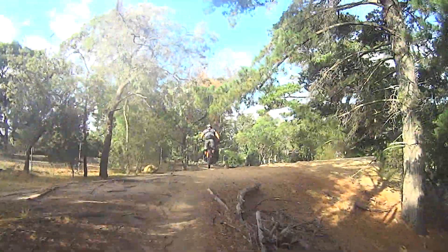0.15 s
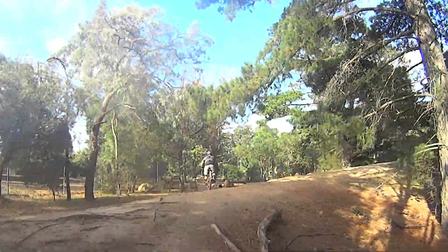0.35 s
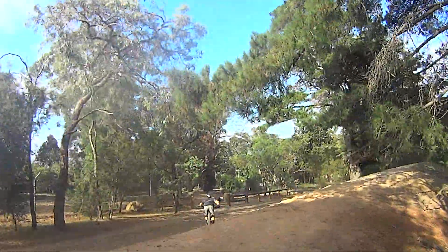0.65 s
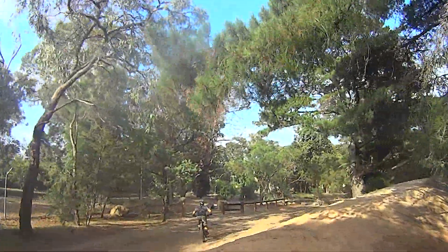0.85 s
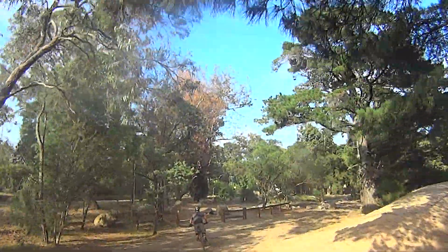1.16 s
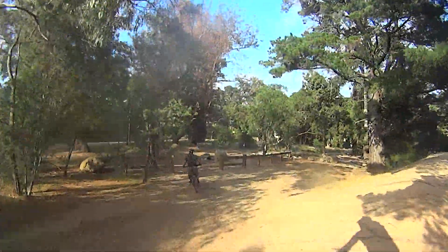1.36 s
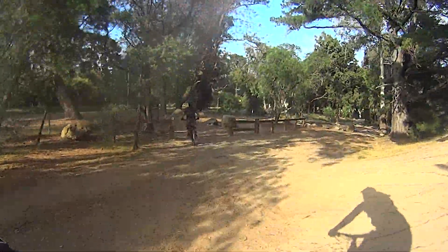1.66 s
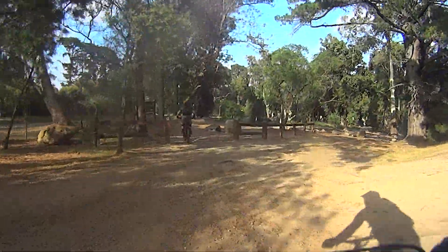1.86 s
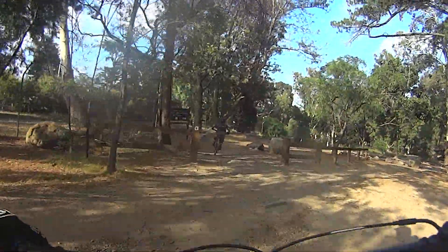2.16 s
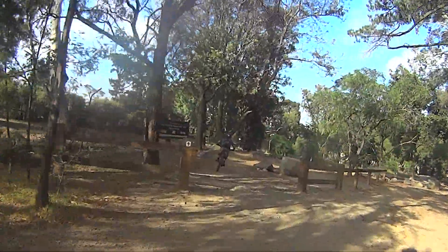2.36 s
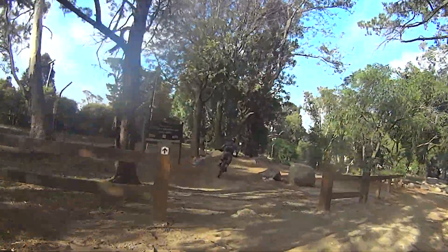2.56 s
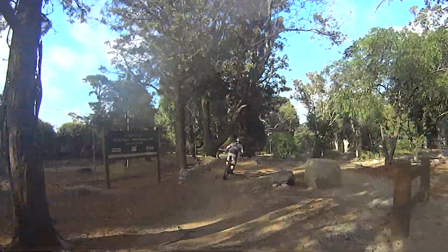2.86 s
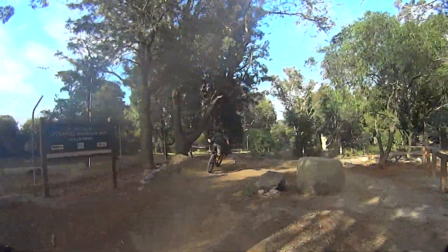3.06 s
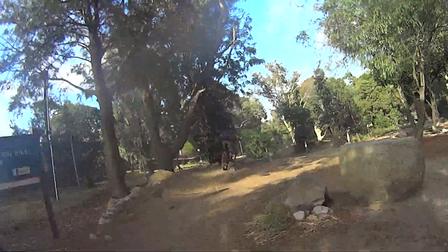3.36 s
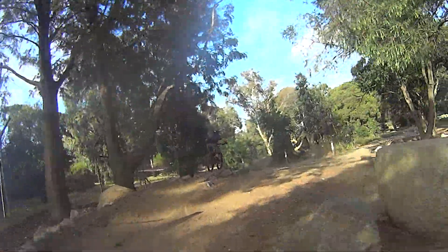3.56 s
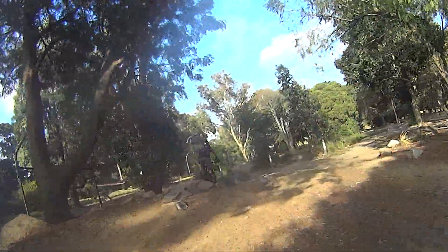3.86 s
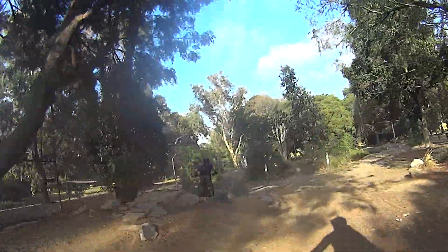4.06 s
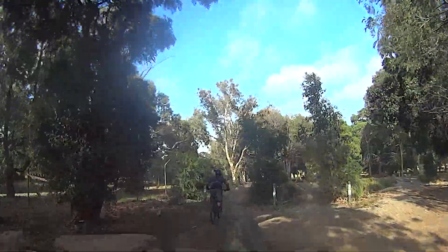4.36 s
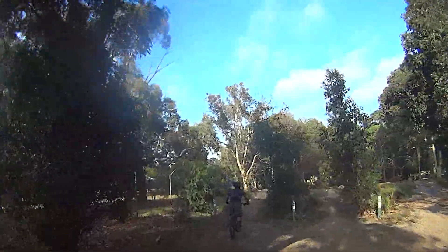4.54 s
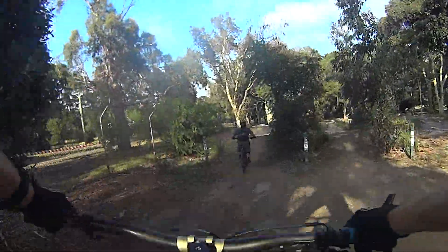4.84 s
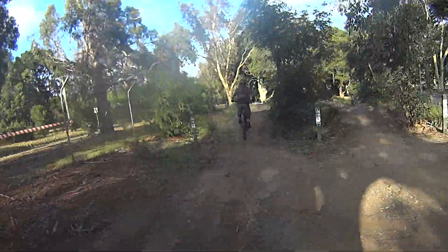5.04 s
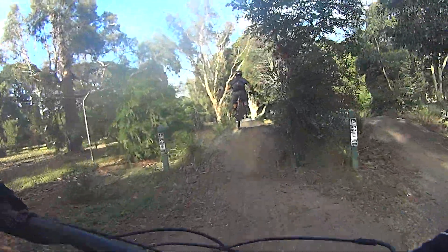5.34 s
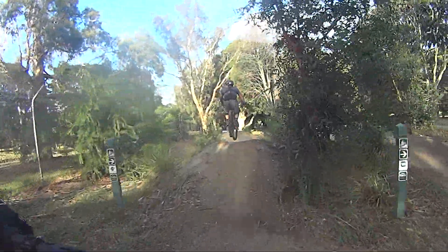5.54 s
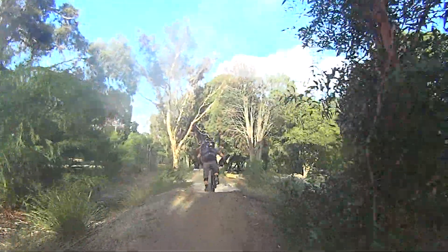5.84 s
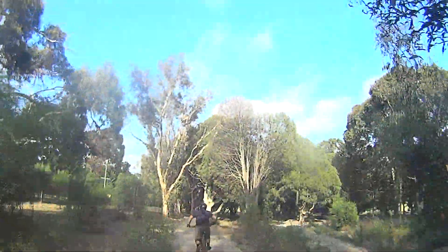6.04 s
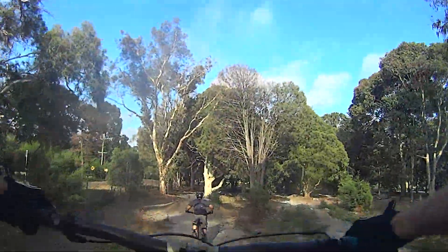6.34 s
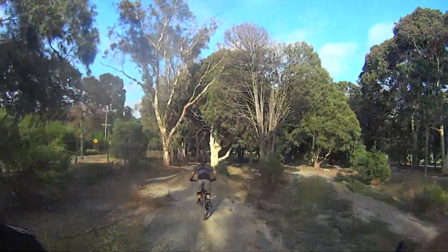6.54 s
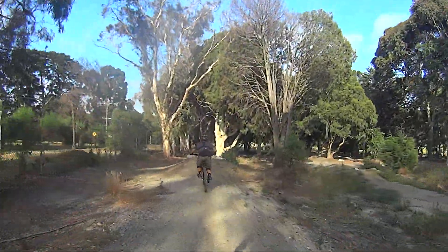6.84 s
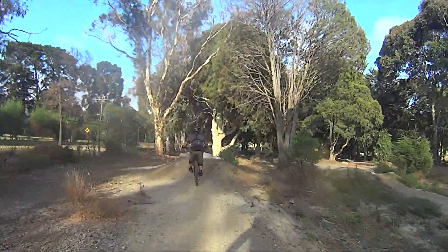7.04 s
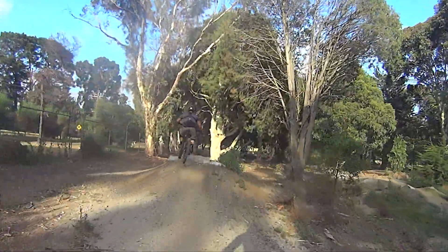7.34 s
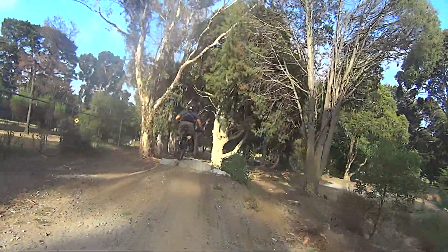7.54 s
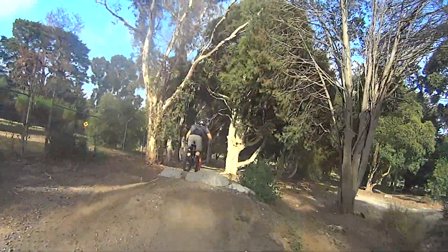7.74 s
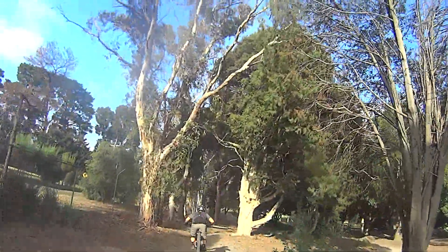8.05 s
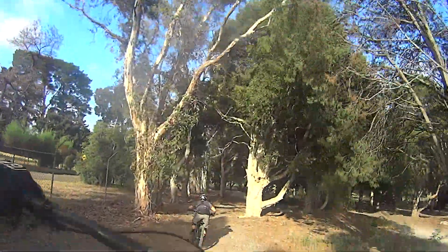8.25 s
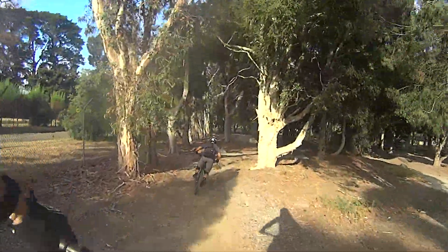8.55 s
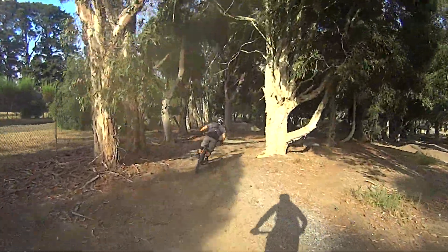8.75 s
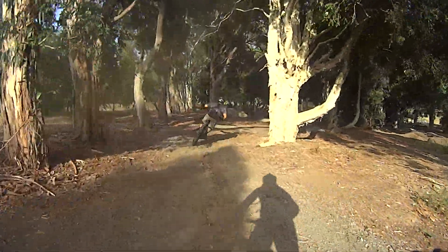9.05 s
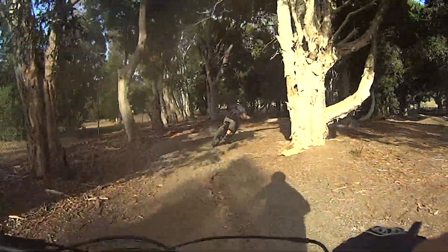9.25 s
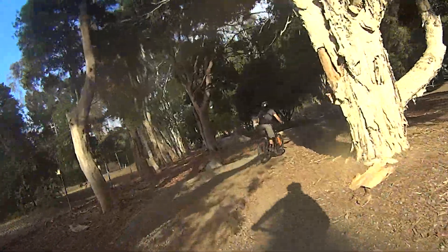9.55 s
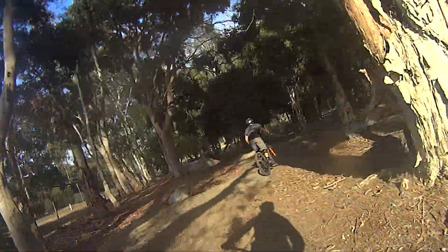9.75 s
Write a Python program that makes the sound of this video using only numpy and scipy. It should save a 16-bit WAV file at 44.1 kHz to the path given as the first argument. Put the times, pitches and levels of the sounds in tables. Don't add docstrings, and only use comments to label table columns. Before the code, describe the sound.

Boxy, nasal tyre grit and ticking freewheel on a dry trail, dropping out over jumps, then crunchy landings, dull thumps and stone cracks.

```python
import sys
import numpy as np
from scipy import signal
from scipy.fft import rfft, irfft, next_fast_len
from scipy.io import wavfile

SR = 44100
rng = np.random.default_rng(int(sys.argv[2]) if len(sys.argv) > 2 else 0)


def digitize_waveform(pressure):
    field = np.atleast_2d(pressure).T
    bounded = np.clip(field, -1, 1)
    quanta = np.round(bounded * 32767).astype(np.int16)
    wavfile.write(sys.argv[1], SR, quanta)


def attenuation_scalar(level_db):
    decades = np.asarray(level_db, float) / 20
    return 10 ** decades


N = 436590
T = np.arange(N) / SR
SIZE = next_fast_len(N + SR // 4)
HZ = np.maximum(np.arange(SIZE // 2 + 1) * SR / SIZE, 1)
PORT_GAP_S = 2.3e-5
PORT_TURN = 2 * np.pi * HZ * PORT_GAP_S
RISE_S = 0.002

# (frequency [Hz], width [Hz], level [dB])
HOUSING = [(1632, 185, 0), (3190, 220, -18), (5160, 260, -22)]
# (frequency [Hz], left minus right [dB])
LEAN = [(60, 0), (140, -0.5), (340, -1), (820, 2.5), (1970, 3.5), (4710, 1), (11300, -1.5)]
# (frequency [Hz], lead of the left [rad])
LEAD = [(60, 0), (130, -.6), (340, -1.8), (860, -2.4), (1300, -1.6)]
# (time of the top [s], peak level [dB], brightness [dB])
SLAPS = [(0.6673, -21, 11), (1.4402, -19, 6), (1.737, -14, -25), (1.7726, -13.5, 7), (2.368, -10, -15),
         (2.503, -9, 0.5), (3.3053, -5, -5), (3.4215, -13, 11), (3.4427, -6, 2), (3.7605, -12, -2),
         (3.8182, -16, -16), (4.14, -17.5, 2), (4.601, -15, 11), (4.66, -12.5, -2.5), (4.8082, -19.5, 3),
         (4.8323, -15.5, 6.5), (4.8983, -12.5, -1), (4.9351, -12.5, 4.5), (5.044, -17.5, 5),
         (5.101, -13, 4), (5.1254, -18, -7), (5.1357, -27, -1), (5.1762, -12.5, -2), (5.9176, -16.5, -1),
         (6.1826, -24, 12), (7.343, -14.5, 0), (8.737, -21, -13), (8.7502, -11, -13), (9.069, -18, -4),
         (9.1324, -17, 3)]


def rms_one(x):
    return x / np.sqrt(np.mean(x ** 2) + 1e-20)


def at_hz(points):
    hz, value = np.transpose(points)
    return np.interp(np.log(HZ), np.log(hz), value)


def causal(magnitude):
    cepstrum = irfft(np.log(rms_one(magnitude)), SIZE)
    cepstrum[1:SIZE // 2] *= 2
    cepstrum[SIZE // 2 + 1:] = 0
    return np.exp(rfft(cepstrum))


def colour(points):
    return causal(attenuation_scalar(at_hz(points)))


def resonance(hz, width_hz):
    return 1 / (1 + 1j * (HZ ** 2 - hz ** 2) / (HZ * width_hz))


def double_resonance(hz, width_hz):
    response = resonance(hz, width_hz) ** 2
    return response / np.sqrt(np.mean(np.abs(response) ** 2))


def drift(rate):
    r = np.exp(-80 * np.pi * rate / SR)
    slow = signal.lfilter([1], [1, -2 * r, r * r], rng.standard_normal(N // 40 + 2002))[2000:]
    return np.interp(np.arange(N) / 40, np.arange(len(slow)), rms_one(slow))


def gritty(per_s, spread_db, grain_s, bed):
    size_db = spread_db * np.minimum(rng.exponential(1, N), 3.3)
    grains = attenuation_scalar(size_db) * (rng.random(N) < per_s / SR)
    r = np.exp(-1 / (grain_s * SR))
    return rms_one(bed + signal.lfilter([1], [1, -r], grains))


def bursts(times, levels_db, fall_s):
    clicks = np.full(N, 1e-18)
    np.add.at(clicks, (np.asarray(times) * SR).astype(int), attenuation_scalar(levels_db))
    return signal.lfilter([1], [1, -np.exp(-1 / (fall_s * SR))], clicks)


def lumps(times, halves_s, levels_db):
    out = np.zeros(N)
    for s, half, db in np.broadcast(times, halves_s, levels_db):
        near = slice(max(int((s - 4 * half) * SR), 0), int((s + 4 * half) * SR))
        out[near] += attenuation_scalar(db) * np.exp(-.5 * ((T[near] - s) / half) ** 2)
    return out


def stereo_tilt(turn=0):
    left = attenuation_scalar(at_hz(LEAN) / 2) * np.exp(.5j * turn)
    return np.array([left, 1 / left])


def to_capsules(envelope, response, turn=0, blows=0):
    # (frequency [Hz], left-right likeness [0 to 1])
    likeness = [(30, .9), (300, .68), (900, .7), (1600, .95), (2500, .42), (3200, .48), (4000, .3),
                (5100, .8), (7000, .4), (11000, .3)]
    noise = envelope * rng.standard_normal((3, N))
    noise[0] += blows
    shared, left, right = rfft(noise, SIZE)
    alike = np.clip(at_hz(likeness), 0, 1)
    pair = np.sqrt(alike) * shared + np.sqrt(1 - alike) * np.array([left, right])
    return pair * response * stereo_tilt(turn)


def wind(blows):
    # (time [s], level [dB])
    gusts = [(0.0, -38.5), (0.77, -30.5), (0.82, -52), (1.13, -51), (1.68, -43.5), (1.82, -34),
             (2.23, -42.5), (3.36, -33.5), (4.3, -47), (4.57, -28.5), (5.02, -46), (5.1, -32), (5.6, -44),
             (8.74, -39), (8.96, -31), (9.21, -54), (9.32, -36), (9.9, -48)]
    # (frequency [Hz], density [dB per Hz])
    buffeting = [(10, -13), (18, -6), (27, 9), (45, -3), (75, -4.5), (110, -19), (170, -9.5), (300, -58.5)]
    trim_db = -3.5
    s, peak_db = np.transpose(blows)[:2]
    jolts = bursts(s, peak_db - 22, fall_s=0.022)
    level = attenuation_scalar(trim_db + np.interp(T, *np.transpose(gusts))) + jolts
    return to_capsules(level * attenuation_scalar(2.8 * drift(15.0)), colour(buffeting))


def hum():
    # (time [s], frequency [Hz], level [dB])
    drumming = [
        (1.6, 65.4, -64),
        (1.642, 69.2, -43.5),
        (2.286, 76.2, -44),
        (2.466, 69.9, -45),
        (3.15, 80, -43.5),
    ]
    s, hz, level_db = np.transpose(drumming)
    level = attenuation_scalar(np.interp(T, s, level_db, left=-120, right=-120) + 3)
    return level * np.sin(2 * np.pi * np.cumsum(np.interp(T, s, hz)) / SR)


def hub():
    # (time [s], rate [clicks per s], level [dB])
    pawls = [
        (0, 35, -39),
        (1.6, 59, -43),
        (3, 73, -66),
        (4.598, 69, -53),
        (6.5, 54, -39),
        (8.499, 76, -38),
        (9.9, 82, -60),
    ]
    s, per_s, level_db = np.transpose(pawls)
    turns = np.cumsum(np.interp(T, s, per_s)) / SR
    at = T[1:][np.diff(np.floor(turns)) > 0]
    uneven_db = 2 * np.interp(at, T, drift(30))
    clicks = bursts(at, np.interp(at, s, level_db) + 11.5 + uneven_db, fall_s=0.0012)
    return to_capsules(clicks, resonance(4760, 330) ** 2)


def ticks():
    # (time [s], peak level [dB])
    snaps_at = [(0.591, -35), (0.637, -35), (1.075, -34.5), (1.7726, -32), (1.789, -29), (1.92, -30.5),
                (1.9694, -24), (2.286, -33), (2.504, -35), (2.675, -31), (2.748, -32), (2.797, -35),
                (3.415, -32), (4.316, -40), (4.8356, -32), (4.932, -32), (5.0855, -35), (5.1088, -38),
                (5.1116, -24.5), (5.169, -36), (5.29, -30), (5.9882, -32), (6.8199, -35), (7.214, -36),
                (7.2639, -34), (8.0663, -28.5), (8.65, -36), (8.719, -30.5), (9.3163, -35)]
    # (frequency [Hz], density [dB per Hz])
    tick_colour = [(1500, -39), (3000, -12.5), (5000, 2), (8000, -4.5), (11000, -13.5)]
    # (frequency [Hz], density [dB per Hz])
    hiss_colour = [(2500, -2.5), (4000, -9.5), (5000, -3), (7000, -8.5), (11000, -12)]
    # (start [s], end [s], level [dB])
    gravel = [
        (1.215, 1.27, -46),
        (1.77, 1.876, -44),
        (5.116, 5.248, -38.5),
        (8.423, 8.503, -56),
        (8.733, 8.83, -49),
    ]
    s, peak_db = np.transpose(snaps_at)
    sprays = sum(attenuation_scalar(db) * np.interp(T, [start, start + 0.0048, end], [0, 1.6, 0]) for start, end, db in gravel)
    snaps = bursts(s, peak_db - 2, fall_s=.0022)
    snaps = snaps + sprays * gritty(per_s=140.0, spread_db=8.0, grain_s=0.012, bed=0.27)
    hiss = attenuation_scalar(-52.5 + 0.8 * drift(4.3))
    return to_capsules(snaps, colour(tick_colour), PORT_TURN) + to_capsules(hiss, colour(hiss_colour), PORT_TURN)


def clinks():
    # (time [s], peak level [dB])
    chain = [
        (1.276, -39),
        (1.441, -47),
        (3.425, -29),
        (3.439, -25),
        (4.601, -33),
        (4.61, -29),
        (5.172, -27),
    ]
    s, peak_db = np.transpose(chain)
    shared, left, right = bursts(s, peak_db, fall_s=.003) * rng.standard_normal((3, N))
    band = signal.butter(2, [3700, 5700], "band", fs=SR, output="sos")
    return 3 * signal.sosfilt(band, shared + .6 * np.array([left, right]))


def mount_blows():
    # (time of the top [s], peak level [dB], pitch [Hz], length [cycles])
    camera_knocks = [(0.003, -24.5, 247, 4.6), (0.045, -17.5, 286, 3.4), (0.113, -17, 209, 6.1),
                     (0.181, -17, 222, 3), (0.326, -18.5, 275, 2.7), (0.403, -17, 235, 5.8),
                     (0.767, -18, 280, 3.5), (0.94, -15, 213, 5.2), (1.001, -11, 285, 7.7),
                     (2.053, -17, 229, 4.3), (2.643, -15.5, 296, 3.7), (2.806, -10.5, 294, 5.5),
                     (3.053, -15.5, 260, 2.7), (3.267, -15, 204, 2.3), (3.277, -13, 246, 4),
                     (3.345, -8, 271, 3.2), (3.495, -16, 246, 6.6), (3.511, -10.5, 271, 4.5),
                     (5.1, -10.5, 254, 1.3), (5.194, -12, 266, 2.3), (5.227, -11, 197, 4.3),
                     (5.234, -12, 216, 11), (5.315, -15.5, 263, 5.3), (6.071, -12.5, 276, 4),
                     (6.799, -10, 289, 6.5), (8.162, -28, 594, 2.1), (8.219, -17, 193, 6),
                     (8.889, -15, 206, 3.4), (8.953, -11.5, 230, 2.9), (8.961, -13, 273, 11),
                     (9.448, -27, 230, 3.4), (9.456, -11.5, 250, 4.9), (9.68, -21, 230, 5.3)]
    # (time of the
    # top [s], peak level [dB], pitch [Hz], snap [dB])
    thumps = [
        (1.091, -5.5, 120, -26),
        (1.443, -22.5, 199, 4),
        (3.407, -16, 152, -3.5),
        (3.418, -11.5, 189, -5),
        (3.426, -7, 123, -11.5),
        (3.439, -22.5, 73, -11),
        (5.045, -15.5, 260, 0),
        (5.259, -21, 108, -22),
    ]
    # (time of the top [s], peak level [dB])
    taps = [(0.097, -26), (0.258, -27.5), (0.387, -28), (0.46, -19), (0.883, -20.5), (1.066, -27),
            (1.157, -20.5), (1.298, -22.5), (1.326, -26.5), (1.375, -27.5), (1.786, -19.5), (1.827, -31),
            (3.141, -28), (3.195, -24), (3.581, -24.5), (3.945, -22), (4.593, -20.5), (4.622, -26),
            (4.723, -31), (5.023, -31), (5.061, -22), (5.075, -22), (5.524, -24), (6.203, -22.5),
            (7.197, -21), (7.305, -25.5), (8.296, -26), (8.325, -21), (8.675, -32), (9.313, -19),
            (9.537, -20.5)]
    rows = []
    for s, db, hz, cycles in camera_knocks:
        snap_db = -7.5 + 8.5 * np.log2(hz / 246)
        rows.append((s, db, hz, snap_db, cycles))
    for s, db, hz, snap_db in thumps:
        rows.append((s, db, hz, snap_db, 2.93))
    for (s, db), luck in zip(taps, rng.standard_normal(len(taps))):
        rows.append((s, db, 227 + 32 * luck, -6.5, 5.3))
    return rows


def knocks(blows):
    out, t = np.zeros((2, N + SR)), np.arange(SR // 8) / SR
    for (s, peak_db, hz, snap_db, cycles), luck in zip(blows, rng.random(len(blows))):
        fall = cycles / hz / np.log(1000)
        shape = (t / fall) ** 2 * np.exp(2 - 2 * t / fall)
        shape = shape + 0.34 * (1 - np.exp(-t / fall)) ** 2 * np.exp(-t / 0.0082)
        at = max(round((s - fall) * SR), 0)
        for side, (turn, body_db) in enumerate([(-0.42, -3), (1.0, 0.1)]):
            turn = turn * min(hz / 260, 1)
            body = np.cos(2 * np.pi * hz * (t - fall) + luck + turn)
            out[side, at:at + len(t)] += attenuation_scalar(peak_db + body_db) * shape * body
    return out[:, :N]


def bracket(blows):
    # (frequency [Hz], width [Hz], level [dB])
    modes = [(735, 49, -1.5), (882, 39, -10.5), (1090, 22, -16.5), (1348, 51, -13.5)]
    # (time [s], level [dB])
    chain_hits = [
        (3.42, -8),
        (3.4404, -2.5),
    ]
    chain_favours = [-18, 1, 2.5, 2.5]
    knock_s, peak_db, _, snap_db, _ = np.transpose(blows)
    slap_s, slap_db, bright_db = np.transpose(SLAPS)
    hit_s, hit_db = np.transpose(chain_hits)
    s = np.r_[knock_s, slap_s - RISE_S, hit_s]
    db = np.r_[peak_db + snap_db, slap_db + bright_db - 20, hit_db]
    luck = rng.standard_normal((len(modes), len(knock_s) + len(slap_s)))
    luck = np.c_[luck, np.outer(chain_favours, np.ones(len(hit_s)))]
    rung = 0
    for (hz, width, mode_db), z in zip(modes, luck):
        strikes = bursts(s, db + mode_db + 36.5 + 5.7 * z, fall_s=1e-5)
        rung = rung + rfft(strikes, SIZE) * resonance(hz, width)
    rung = rung / (1 + 1j * HZ / 2500) ** 2
    return rung * stereo_tilt(at_hz(LEAD))


def frame(rumble_db, blows):
    # (frequency [Hz], density [dB per Hz])
    rumble_colour = [(53, -21), (90, -7.5), (226, -3.5), (424, -6), (572, -10), (671, -8), (905, -16),
                     (1230, -17), (1400, -21), (1820, -27), (3080, -120)]
    # (frequency [Hz], density [dB per Hz])
    snap_colour = [(200, 0), (380, -1), (600, -3), (1100, -7), (1450, -25), (3000, -49)]
    # (start [s], end [s], level [dB])
    rattles = [
        (1.045, 1.321, -37),
        (1.794, 1.94, -38),
        (3.435, 3.492, -33),
        (4.665, 4.764, -38),
        (6.128, 6.255, -38.5),
        (7.959, 8.118, -39.5),
    ]
    s, peak_db, _, snap_db, _ = np.transpose(blows)
    shake = gritty(per_s=60, spread_db=2.5, grain_s=.004, bed=1.5)
    edges = bursts(s, peak_db + snap_db + 9.0, fall_s=1e-5)
    rattle = bursts(np.maximum(s - .003, 0), peak_db + snap_db - 1.5, fall_s=0.008)
    loose = sum(attenuation_scalar(db) * ((T > start) & (T < end)) for start, end, db in rattles)
    rattle = rattle + loose * gritty(per_s=120.0, spread_db=1.0, grain_s=0.0019, bed=1.0)
    turn = at_hz(LEAD)
    rumble = to_capsules(attenuation_scalar(rumble_db + 6.5) * shake, colour(rumble_colour), turn)
    return rumble + to_capsules(rattle, colour(snap_colour), turn, blows=edges) + bracket(blows)


def impacts():
    # (time of the top [s], peak level [dB], brightness [dB])
    rebounds = [
        (1.277, -25, 8),
        (3.449, -7, -9),
        (3.454, -20, -23),
        (4.61, -31, 8),
    ]
    # (time of the top [s], peak level [dB])
    stones = [
        (2.238, -8),
        (2.873, -8),
        (5.761, -5.5),
        (7.4458, -11),
        (7.6629, -7),
        (8.715, -16),
        (9.0201, -9.5),
    ]
    # (time of the top [s], peak level [dB])
    scatter = [
        (6.761, -3.5),
        (6.8995, 1),
        (6.947, -7),
        (7.016, -8.5),
    ]
    edge_db = -32
    dull = [(s, db, edge_db - db) for s, db in stones + scatter]
    s, peak_db, bright_db = np.transpose(SLAPS + rebounds + dull)
    return s - RISE_S, peak_db, bright_db


def struck_air(s, peak_db):
    # (time [s], half length [s], level [dB])
    swishes = [
        (8.4, 0.012, -38),
        (8.451, 0.023, -31),
        (8.642, 0.007, -30),
    ]
    blows = bursts(s, peak_db + 9.0, fall_s=1e-5)
    grind = lumps(s + 0.0011, 0.003, peak_db - 15.5)
    swells = grind + lumps(*np.transpose(swishes))
    return to_capsules(swells, double_resonance(*HOUSING[0][:2]), blows=blows)


def pebble_drags():
    # (time of the middle [s], half length [s], peak level [dB])
    early = [(0.052, 0.0023, -20), (0.069, 0.0011, -23), (0.123, 0.0034, -25), (0.188, 0.0021, -25),
             (0.247, 0.0024, -23), (0.3071, 0.0021, -29), (0.7966, 0.0018, -24), (0.814, 0.0021, -25),
             (1.118, 0.0027, -23.5), (1.173, 0.0019, -19.5), (1.239, 0.0024, -19.5), (1.751, 0.0031, -24),
             (1.794, 0.0075, -28), (1.817, 0.0022, -21), (1.84, 0.015, -25.5), (1.867, 0.0039, -17),
             (1.887, 0.0063, -21), (1.9, 0.0012, -19), (1.934, 0.0019, -18.5), (1.965, 0.0044, -20.5),
             (2.102, 0.0022, -19), (2.135, 0.004, -16), (2.164, 0.0023, -19), (2.218, 0.0023, -20),
             (2.275, 0.0025, -20), (2.2893, 0.0023, -20), (2.297, 0.0019, -26), (2.324, 0.0022, -22),
             (2.337, 0.0019, -17), (2.347, 0.0036, -19), (2.362, 0.0022, -17), (2.395, 0.0021, -18),
             (2.408, 0.0063, -24), (2.453, 0.0077, -23), (2.465, 0.0012, -12), (2.493, 0.0045, -23),
             (2.539, 0.0026, -19), (2.576, 0.0053, -20.5), (2.613, 0.0021, -23), (2.638, 0.0052, -20),
             (2.664, 0.0056, -21), (2.685, 0.0033, -26), (2.7473, 0.003, -26), (2.92, 0.0019, -30),
             (2.926, 0.0031, -24), (2.998, 0.003, -24), (3.044, 0.004, -23), (3.17, 0.0025, -30),
             (3.19, 0.0037, -23.5), (3.277, 0.0039, -20), (3.29, 0.0022, -21), (3.371, 0.002, -23),
             (3.388, 0.0021, -20), (3.4, 0.006, -22), (3.4119, 0.0021, -21), (3.618, 0.0025, -21)]
    middle = [(3.65, 0.006, -15), (3.6924, 0.004, -22), (3.7811, 0.0031, -22), (3.809, 0.0028, -20),
              (3.8527, 0.0029, -20.5), (3.8834, 0.0022, -19), (3.9276, 0.0063, -19.5),
              (3.9514, 0.0031, -20.5), (3.9622, 0.0016, -20), (4.0565, 0.0017, -20), (4.0866, 0.0034, -25),
              (4.3195, 0.0027, -18), (4.3678, 0.002, -21), (4.4439, 0.0025, -24), (4.4666, 0.0044, -24),
              (4.4961, 0.0026, -25), (4.5074, 0.0033, -24), (4.6795, 0.0033, -26.7), (5.1369, 0.002, -16),
              (5.1883, 0.0023, -15.5), (5.211, 0.0046, -17), (5.3484, 0.0019, -24), (5.3958, 0.0023, -23),
              (5.425, 0.0025, -28), (5.6056, 0.0033, -22), (5.625, 0.0013, -20), (5.667, 0.0013, -29),
              (5.692, 0.024, -22.5), (5.7155, 0.0035, -24), (5.726, 0.0025, -22), (5.739, 0.0016, -18),
              (5.7924, 0.0021, -17), (5.8015, 0.0024, -12.5), (5.898, 0.002, -22), (6.0425, 0.002, -22),
              (6.0641, 0.0022, -27), (6.0734, 0.0024, -21), (6.09, 0.0041, -24), (6.1037, 0.0033, -26),
              (6.1292, 0.0035, -29), (6.1797, 0.0021, -26), (6.3143, 0.0055, -26.5), (6.7934, 0.0049, -13),
              (6.812, 0.0018, -21), (6.8196, 0.0017, -12.5), (6.8293, 0.00095, -14), (6.8446, 0.0025, -21),
              (6.8547, 0.0047, -31), (6.8649, 0.0041, -19), (6.8796, 0.0034, -10.5), (6.89, 0.0033, -15),
              (6.925, 0.0034, -13), (6.9365, 0.0023, -17), (6.9568, 0.0022, -17), (6.979, 0.0018, -12),
              (7.0315, 0.0019, -21)]
    late = [(7.0427, 0.002, -21), (7.0535, 0.0019, -19), (7.0859, 0.0032, -19.5), (7.097, 0.0016, -15),
            (7.1582, 0.0044, -24), (7.196, 0.0022, -15), (7.2117, 0.0018, -17.5), (7.2468, 0.0017, -14.5),
            (7.2568, 0.0027, -13), (7.2696, 0.0019, -21), (7.279, 0.0022, -13.5), (7.5056, 0.0028, -25),
            (7.5151, 0.0037, -22), (7.5336, 0.0036, -22), (7.58, 0.0035, -23), (7.6186, 0.0045, -23),
            (7.6789, 0.0026, -19), (7.6904, 0.0043, -19.5), (7.716, 0.0025, -21), (7.878, 0.0026, -19),
            (7.8999, 0.004, -26), (7.9288, 0.0016, -19), (7.943, 0.0037, -21), (7.9565, 0.0024, -21),
            (7.9757, 0.0032, -21), (7.9888, 0.0018, -19), (7.9994, 0.0029, -15), (8.013, 0.0048, -15.5),
            (8.0319, 0.0048, -19), (8.068, 0.021, -21.5), (8.081, 0.0019, -29), (8.0913, 0.0026, -33),
            (8.4404, 0.0029, -35), (8.4736, 0.002, -36), (8.7598, 0.0024, -33), (8.801, 0.0026, -20.5),
            (8.894, 0.0033, -22), (9.0354, 0.0023, -22), (9.0563, 0.0025, -26), (9.1, 0.0089, -21),
            (9.2745, 0.0037, -26), (9.392, 0.0035, -17), (9.4682, 0.0037, -27), (9.606, 0.0042, -20.5),
            (9.637, 0.0097, -24), (9.723, 0.0024, -29), (9.743, 0.005, -26), (9.7656, 0.0026, -21),
            (9.862, 0.0058, -23), (9.884, 0.0081, -20.5)]
    return lumps(*np.transpose(early + middle + late))


def pebbles(drags):
    hz = 1.01 * HOUSING[0][0] + 40.26 * drift(35.44)
    note = attenuation_scalar(-4) * drags * np.sin(2 * np.pi * np.cumsum(hz) / SR)
    return rfft(note, SIZE) * stereo_tilt()


def grit_cracks():
    # (time [s], peak level [dB])
    early = [(1.02, -29), (1.075, -22.5), (1.728, -30), (1.752, -44), (1.808, -24), (1.911, -25),
             (2.172, -28), (2.2964, -18.5), (2.4423, -23), (2.573, -20.5), (2.61, -22), (2.662, -24),
             (2.9846, -21), (3.3707, -17)]
    late = [
        (6.8203, -28),
        (7.051, -25),
        (7.2144, -25),
        (7.241, -29),
        (7.277, -25),
        (7.3382, -25),
        (7.4429, -30),
    ]
    further = [
        (4.576, -29),
        (4.657, -29),
        (8.866, -30),
        (8.89, -28),
        (8.9166, -38),
        (9.0443, -26),
        (9.094, -24),
        (9.3844, -39),
    ]
    s, db = np.transpose(early + late + further)
    return bursts(s, db - 8, fall_s=0.0061)


def crackle(grit, bright_db, snaps, edges):
    # (frequency [Hz], gain [dB])
    wall = [(300, -77), (1000, -31), (1350, -22), (2000, -18), (2650, -20.5), (3400, -20.5), (3900, -43.5),
            (4600, -27.5), (5800, -57), (7500, -39.5), (11000, -57)]
    upper = sum(np.abs(attenuation_scalar(db) * resonance(hz, width)) ** 2 for hz, width, db in HOUSING[1:])
    high = causal(np.sqrt(upper + attenuation_scalar(2 * at_hz(wall))))
    below = 1 / (1 + (HZ / 3300) ** 8)
    out = 0
    for share, cracks in ((below, grit_cracks()), (1 - below, 0)):
        clumps = gritty(per_s=99.0, spread_db=2.5, grain_s=0.0037, bed=1.37) * attenuation_scalar(1.6 * drift(11.0))
        bright = attenuation_scalar(bright_db - 1.45) * grit * clumps + snaps + cracks
        out = out + to_capsules(bright, high * np.sqrt(share), PORT_TURN, blows=edges * np.sqrt(.5))
    return out


def lowest_buzz(grit):
    hz, width, _ = HOUSING[0]
    lean_db = 2.0 * drift(30.0)
    out = 0
    for side in (-1, 1):
        response = double_resonance(hz + side * 32, 1.14 * width)
        out = out + to_capsules(attenuation_scalar(-8.0 + side * lean_db) * grit, response)
    return out


def rolling(buzz_db, bright_db):
    s, peak_db, edge_db = impacts()
    grit = gritty(per_s=150.0, spread_db=1.0, grain_s=0.0014, bed=2.2) * attenuation_scalar(buzz_db + 0.6 * drift(1.07))
    edges = bursts(s, peak_db + edge_db - 33.0, fall_s=1e-5)
    drags = pebble_drags()
    snaps = bursts(s, peak_db + edge_db - 21.0, fall_s=0.0039) + attenuation_scalar(-32.5) * drags
    return struck_air(s, peak_db) + pebbles(drags) + crackle(grit, bright_db, snaps, edges) + lowest_buzz(grit)


def scene():
    # (time [s], load as rolling buzz [dB], roughness as frame rumble [dB])
    ride = [(0.0, -32.5, -44), (0.77, -35, -46.5), (1.85, -32, -45), (2.45, -28, -42.5), (2.85, -33, -45),
            (3.39, -29.5, -46), (4.36, -32.5, -48), (5.1, -29, -40.5), (5.51, -33.5, -49),
            (5.75, -30.5, -44.5), (6.07, -29, -46), (6.84, -26, -47), (7.1, -28, -47), (7.39, -30.5, -45.5),
            (8.0, -31.5, -49.5), (8.96, -33, -42.5), (9.25, -32.5, -45.5), (9.9, -31, -45.5)]
    # (unweighting starts [s], lightest from [s], loss [dB], landing crunch [dB], crunch length [s])
    hops = [
        (0.79, 0.85, 3, 0, 0.073),
        (1.18, 1.474, 11.5, 5, 0.29),
        (3.447, 3.49, 4, -8, 0.051),
        (4.4, 4.935, 8.5, 8.5, 0.12),
        (6.107, 6.438, 15, -1.5, 0.15),
        (8.156, 8.35, 6.5, 6.5, 0.083),
    ]
    landings = [
        0.93,
        1.725,
        3.62,
        5.088,
        6.752,
        8.708,
    ]
    s, load_db, rough_db = np.transpose(ride)
    load_db, rough_db = np.interp(T, s, load_db), np.interp(T, s, rough_db)
    bright_db = -9.5 - 0.19 * (load_db + 38.0)
    loss_db = 0
    for (start, light, db, crunch_db, crunch_s), land in zip(hops, landings):
        loss_db = loss_db + np.interp(T, [start, light, land, land + 0.0024], [0, db, db, 0])
        crunch = (T > land) * np.exp(-(np.maximum(T - land, 0) / crunch_s) ** 2)
        bright_db = bright_db + crunch_db * crunch
    blows = mount_blows()
    spectra = wind(blows) + hub() + ticks()
    spectra = spectra + frame(rough_db - 0.55 * loss_db, blows)
    spectra = spectra + rolling(load_db - loss_db, bright_db + 0.085 * loss_db)
    return irfft(spectra, SIZE)[:, :N] + knocks(blows) + hum() + clinks()


def band_limit(x):
    return signal.sosfilt(signal.butter(12, 11860, fs=SR, output="sos"), x)


def record(dry):
    soft = 2.6 * np.tanh(dry / 2)
    cut = signal.sosfilt(signal.cheby1(13, 1, 10960, fs=SR, output="sos"), soft)
    return band_limit(cut)


dry = scene()
out = record(dry)
digitize_waveform(out)
```